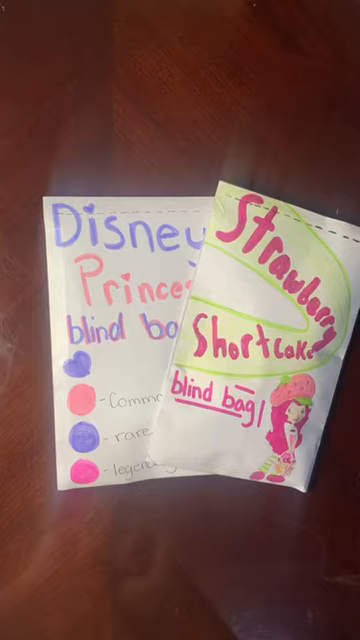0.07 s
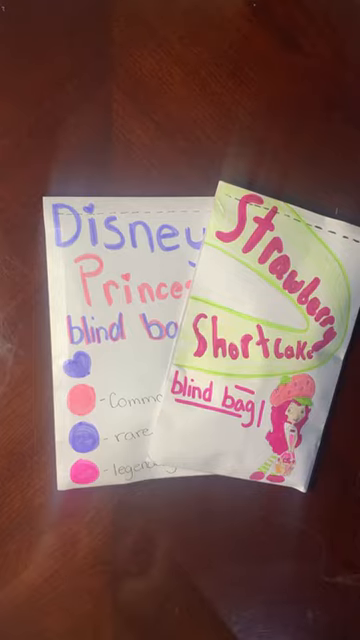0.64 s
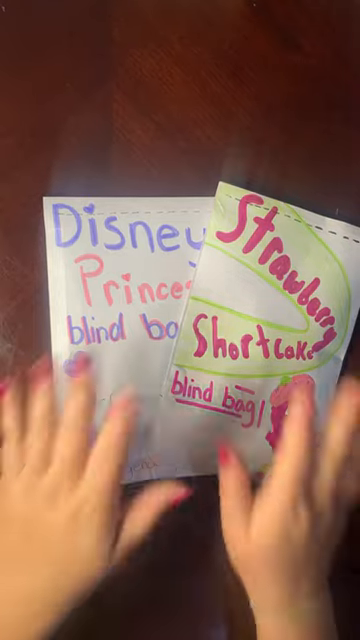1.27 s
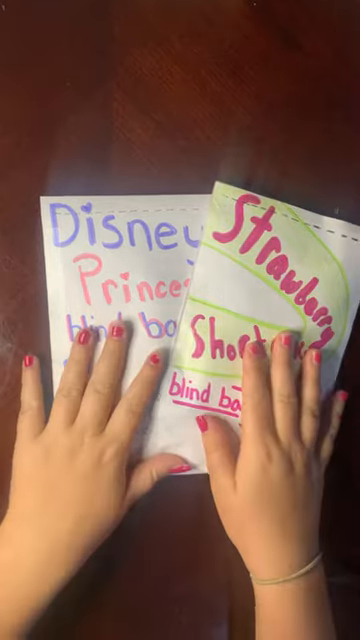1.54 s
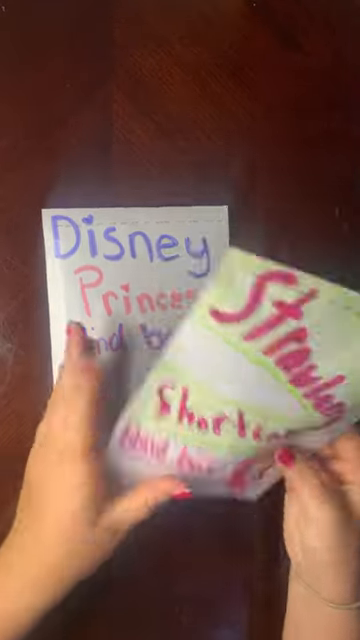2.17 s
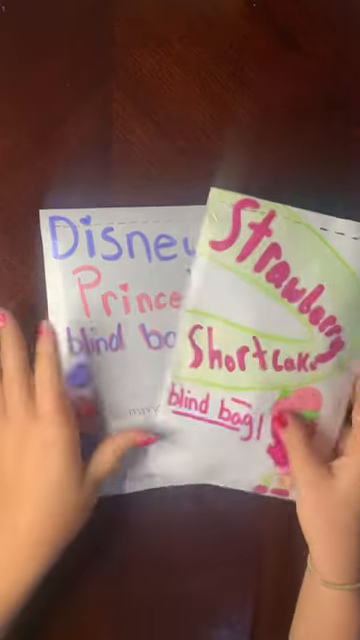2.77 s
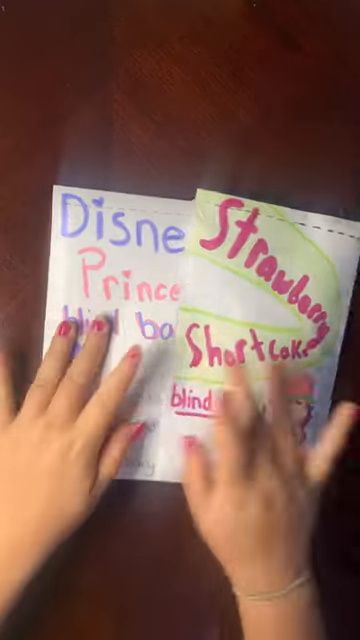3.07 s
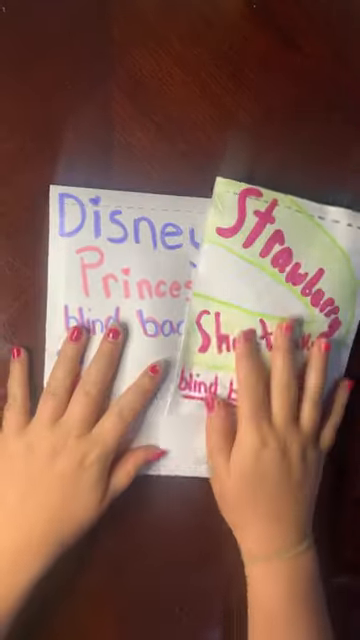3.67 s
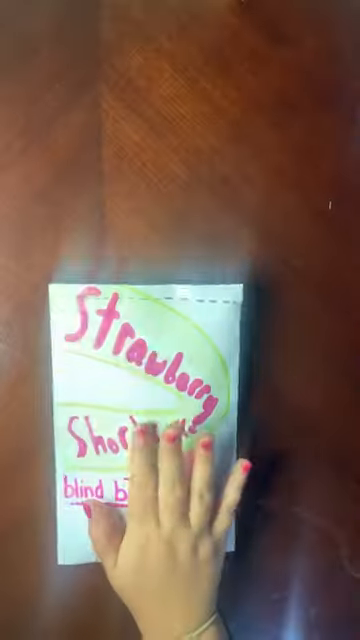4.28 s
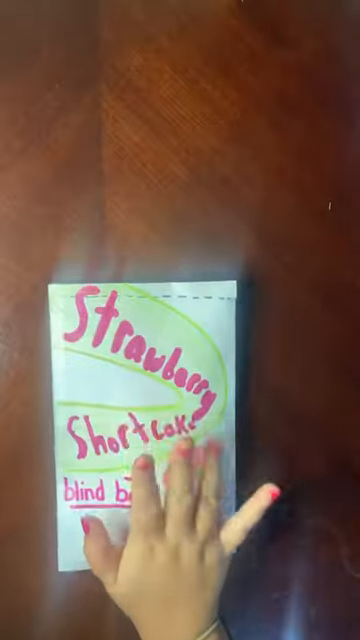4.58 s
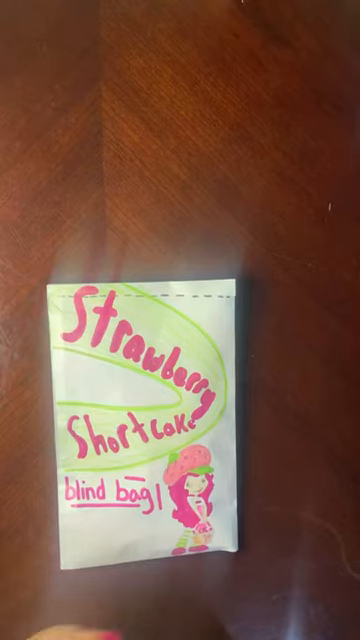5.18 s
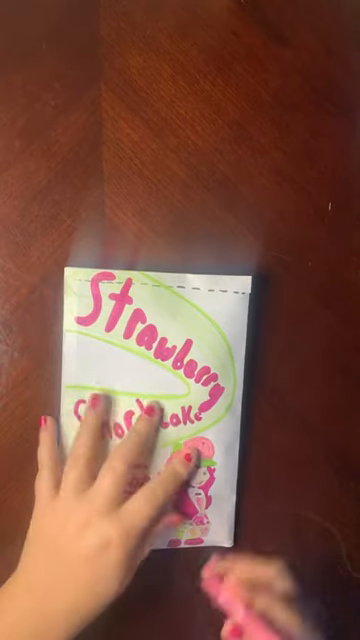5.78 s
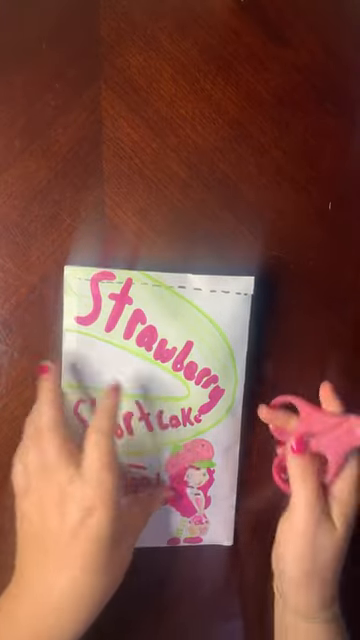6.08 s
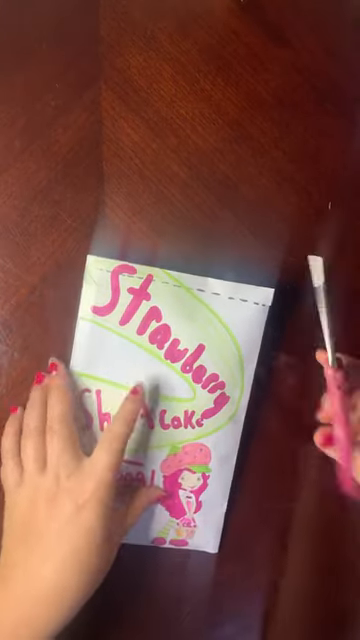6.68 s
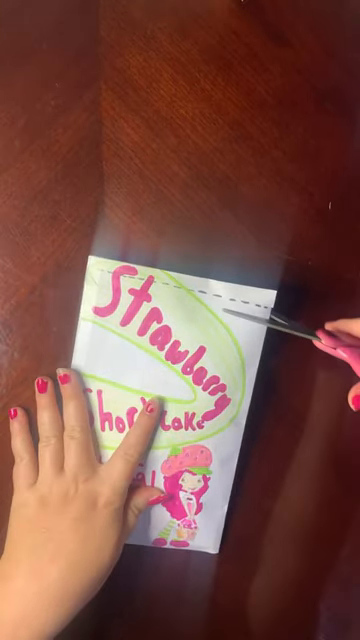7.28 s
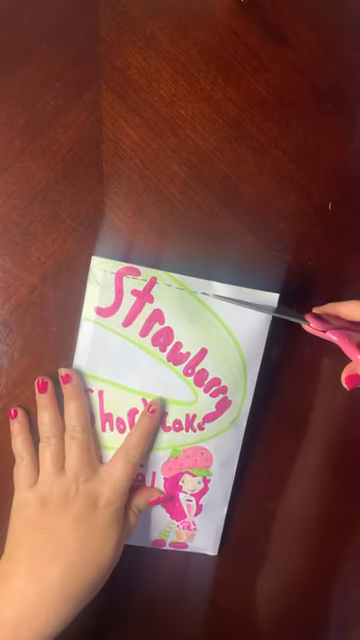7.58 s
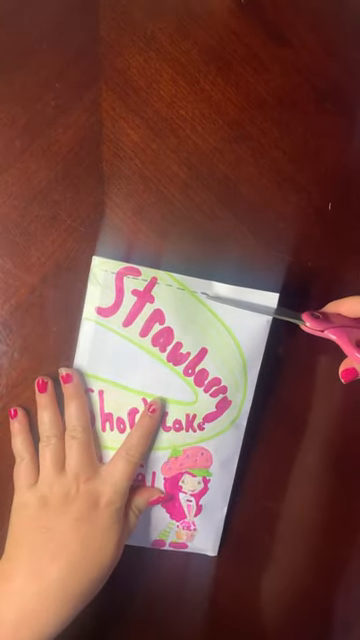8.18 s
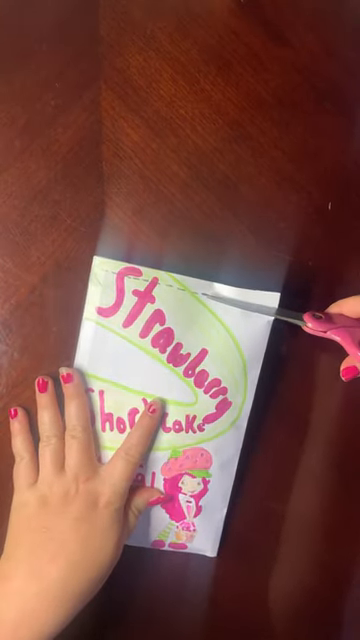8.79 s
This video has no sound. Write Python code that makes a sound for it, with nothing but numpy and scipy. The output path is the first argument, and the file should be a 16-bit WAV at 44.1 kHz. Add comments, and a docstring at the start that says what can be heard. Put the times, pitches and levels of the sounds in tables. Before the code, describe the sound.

In a quiet room with a faint hum, two hands slap down on paper packets and the wooden table booms beneath them. The packets are lifted, patted and slid about, the stiff paper popping and hissing, close to the microphone. The handling softens. Scissors then open with a rub of steel, scrape onto the paper's edge and crunch slowly through it, ending with a clack.

```python
"""Over a quiet room's faint hum, two hands slap down on paper packets on a wooden table, close up.
The table booms; the packets are lifted, patted and slid about, the stiff paper popping as it buckles
and hissing as it drags. Then scissors open with a rub of steel, scrape onto the paper's edge and
close through it, fibre bundle by fibre bundle, with a clack as it gives.
The sound drops out briefly at the very start and once midway."""
import sys
import numpy as np
from scipy import signal
from scipy.fft import rfft, irfft
from scipy.io import wavfile
from scipy.ndimage import uniform_filter1d

SR = 44100
rng = np.random.default_rng(int(sys.argv[2]) if len(sys.argv) > 2 else 0)


def materialize(psi):
    """Save the field psi as 16-bit PCM at rate SR to the path in sys.argv[1].

    A 1-D psi becomes a single channel; in a 2-D psi each row is a channel.
    """
    bounded = np.clip(np.atleast_2d(psi).T, -1, 1)
    quanta = np.round(bounded * 32767).astype(np.int16)
    wavfile.write(sys.argv[1], SR, quanta)


N = 393372
TIME = np.arange(N) / SR

# Cue levels are set ahead of each layer's trim and tone shaping.
# a hand grips or presses a packet: start_s, hold_s, flex_db, table_bump_db
HAND_GRIPS = [(1.53, 0.033, -53.5, -52), (1.72, 0.029, -63.5, -49.5), (1.84, 0.06, -49.5, -52.5),
              (1.96, 0.048, -57.5, -59), (2.03, 0.046, -55, -47.5), (2.1, 0.037, -50.5, -52),
              (2.245, 0.029, -45.5, -53), (2.288, 0.014, -47, -47), (2.37, 0.035, -45, -50.5),
              (2.49, 0.022, -46, -49.5), (2.585, 0.031, -41, -47.5), (2.745, 0.056, -49, -49),
              (2.8, 0.035, -50, -55), (2.895, 0.013, -59, -43.5), (2.94, 0.019, -57, -54),
              (3.07, 0.039, -42.5, -45), (3.165, 0.011, -50.5, -53), (3.225, 0.048, -53, -48.5),
              (3.315, 0.053, -57, -56), (3.39, 0.017, -59, -52), (3.546, 0.023, -45.5, -43.5),
              (3.77, 0.083, -45.5, -46.5), (4.03, 0.082, -61.5, -72), (4.22, 0.033, -61, -68),
              (4.29, .1, -61, -55.5), (4.45, 0.048, -65.5, -71), (4.605, 0.015, -50, -52),
              (5.335, 0.017, -53, -53), (5.42, 0.041, -58, -63), (5.545, 0.032, -49.5, -60),
              (5.62, 0.057, -66, -74), (5.915, 0.0092, -48, -75), (6.17, 0.076, -60.5, -56),
              (6.28, 0.075, -59, -75), (8.04, 0.047, -61.5, -64), (8.67, 0.13, -62, -62),
              (8.86, .05, -58, -66)]
# a packet is pushed over the table or the other packet: start_s, push_s, top_speed_hiss_db
PACKET_PUSHES = [(1.77, 0.089, -44.5), (1.89, 0.038, -52), (1.964, .012, -44.5), (1.975, 0.074, -47),
                 (2.102, 0.026, -42), (2.655, 0.052, -51), (2.728, 0.02, -38), (2.76, 0.064, -43.5),
                 (2.855, 0.027, -32.5), (3.295, .012, -51.5), (3.665, 0.18, -32.5), (5.82, 0.053, -59),
                 (5.905, 0.038, -47)]
# paper buckles and fingertips tap: start_s, body_db, centre_hz, crisp_db
PAPER_POPS = [(1.068, -59, 1500, -55.5), (1.4262, -42, 2430, -45), (1.5605, -33.5, 686, -53),
              (1.5797, -44, 2520, -44), (1.6113, -42, 670, -56), (1.6574, -44, 790, -65),
              (1.6813, -48, 675, -75), (1.8484, -33, 750, -41), (1.8863, -31.5, 2920, -39),
              (2.0372, -42, 1210, -45.5), (2.1039, -34.5, 1970, -40), (2.1172, -34.5, 2720, -37),
              (2.12, -33.5, 1830, -44), (2.152, -25, 1960, -26), (2.156, -46, 2440, -30.5),
              (2.2466, -26, 2440, -34), (2.2744, -52, 1550, -42), (2.324, -48, 1330, -44.5),
              (2.3781, -36, 2500, -47), (2.3958, -35, 1770, -49), (2.4237, -37, 1680, -44),
              (2.4719, -40.5, 1010, -54), (2.4968, -40.5, 970, -59), (2.5186, -40, 1630, -42.5),
              (2.612, -35.5, 1720, -42), (2.6346, -39, 1550, -48), (2.7543, -41, 1780, -39),
              (2.779, -40, 1270, -44), (2.8171, -26, 2540, -41), (2.8994, -35, 2060, -27.5),
              (3.0682, -29.5, 1620, -55), (3.0842, -32.5, 1110, -43), (3.0947, -46, 1460, -41),
              (3.104, -41, 1530, -37.5), (3.1454, -43.5, 2070, -32), (3.2616, -35, 1350, -61),
              (3.3491, -41, 2270, -53), (3.403, -59, 1560, -43.5), (3.4183, -39.5, 1150, -64),
              (3.5583, -34.5, 2630, -34), (3.6063, -23, 1710, -37), (3.623, -26, 2710, -27),
              (3.6308, -33, 2180, -34), (4.041, -48.5, 1190, -69), (4.0976, -45.5, 1470, -72),
              (4.2978, -46, 990, -51.5), (4.3483, -54, 1180, -52), (4.4698, -37.5, 1170, -54),
              (4.6037, -34, 2340, -39.5), (4.6754, -40, 1390, -69), (4.7037, -37.5, 1260, -60),
              (5.3552, -47, 1530, -49), (5.432, -40.5, 2780, -63), (5.4694, -44, 1060, -71),
              (5.5802, -37, 1730, -46), (5.6366, -38, 1600, -68), (5.6601, -41, 1170, -71),
              (5.7304, -46, 1670, -80), (5.9518, -58, 820, -62), (6.734, -52.5, 880, -59),
              (6.7988, -53, 1080, -65), (8.1395, -48, 900, -69), (8.264, -45.5, 960, -67)]
# palms, fingers and packets land: start_s, contact_s, slap_db, crisp_db, thump_db
LANDINGS = [(1.3074, 0.0037, -38.5, -40.5, -54.5), (1.314, 0.014, -15.5, -17, -20.5),
            (1.323, 0.003, -21.5, -26, -33.5), (1.3316, 0.003, -23, -24.5, -37),
            (1.3706, 0.0017, -32.5, -28, -38.5), (2.2427, 0.0054, -42, -48, -50),
            (2.256, 0.0055, -35, -43, -63), (3.0581, 0.011, -36, -43, -48), (3.133, 0.018, -36, -46, -52),
            (3.217, 0.019, -40.5, -68, -50.5), (3.5968, 0.0021, -17.5, -25, -36.5),
            (3.5991, 0.0086, -22, -31.5, -42), (3.611, 0.0039, -18.5, -25.5, -47),
            (4.596, 0.0077, -39, -45, -47.5), (5.408, 0.0022, -41, -44, -63), (5.561, 0.012, -47, -65, -57),
            (6.166, 0.0066, -50.5, -54, -44.5), (6.217, 0.0074, -64, -76, -57),
            (6.2791, 0.0012, -38.5, -38, -69)]
# the blades rub each other as they open: start_s, length_s, level_db
OPENING_RUBS = [(6.623, 0.025, -37.5), (6.662, 0.021, -48.5)]
# the open blades are nudged onto the packet: start_s, length_s, scrape_db, rustle_db
BLADE_NUDGES = [(7.018, .15, -48.5, -55), (7.19, 0.043, -50, -51.5), (7.24, 0.032, -49.5, -47),
                (7.295, 0.05, -57, -55), (7.35, 0.032, -47.5, -49.5), (7.448, 0.013, -61, -52.5)]
# the blade's reflection off the table as the scissors are lowered: time_s, lag_s
REFLECTION_LAG = [(7.02, 0.00088), (7.16, 0.00071), (7.3, 0.00067), (7.4, .00056)]
# the blades are squeezed shut, tearing fine fibres: start_s, length_s, start_db, swell_db_per_s
SQUEEZES = [(7.848, 0.69, -53, -10), (8.635, 0.32, -56, 24)]
# fibre bundles give way: start_s, length_s, level_db
BUNDLE_SNAPS = [(7.932, 0.0027, -45.5), (8.048, 0.012, -42), (8.084, .006, -46), (8.151, 0.0057, -41.5),
                (8.224, 0.0051, -43), (8.25, 0.012, -40), (8.308, .002, -50), (8.324, 0.004, -47),
                (8.345, 0.0061, -41), (8.376, 0.0024, -37), (8.403, 0.0018, -48), (8.438, 0.0034, -40),
                (8.4436, .0008, -33.5), (8.457, 0.0013, -41), (8.473, 0.0085, -42.5),
                (8.487, 0.0018, -37.5), (8.514, 0.0018, -47), (8.6398, 0.0036, -34), (8.647, 0.0018, -37),
                (8.657, 0.0028, -44), (8.676, 0.0022, -38), (8.734, .002, -46), (8.74, 0.0014, -38),
                (8.763, 0.0026, -37.5), (8.768, 0.0066, -33.5), (8.808, 0.009, -26), (8.8638, 0.0046, -32),
                (8.893, 0.0068, -30)]
# the cut travels from near the pivot to the tips: start_s, end_s
PIVOT_TO_TIPS = [7.93, 8.3]
# the sound drops out: start_s, end_s
SILENT_GAPS = [(0, .055), (4.175, 4.211)]

# ringing modes: pitch_hz, level_db, t60_s
TABLE_MODES = [(85, 0, .25), (143, -4, .12), (250, -15, .08), (300, -15, .1), (382, -20, .16)]  # wooden table top
SCISSOR_MODES = [(1150, -7, .007), (1500, -1, .011), (1800, 0, .014), (2380, -1, .011), (2750, -2, .01),
                 (3950, -2, .009)]  # clacking scissors

# EQ curves: frequency_hz, relative_db
ROOM_EQ = [(20, -4), (65, -4), (100, -10.5), (200, -9.5), (400, -16.5), (1000, -20), (2500, -25.5),
           (7000, -28.5), (11000, -28), (16000, -29.5)]  # room tone
BUMP_EQ = [(20, -5.5), (50, 0), (100, -4.5), (170, -6.5), (260, -12.5), (600, -38.5)]  # hands bumping the table
FLEX_EQ = [(80, -14), (250, 2), (600, 1.5), (1100, -0.5), (1900, -4.5), (3200, -6.5), (5000, -11),
           (8000, -18), (16000, -39)]  # bending paper
SLIDE_EQ = [(300, -1), (1500, -2.5), (4000, -3), (6500, -2), (10000, 2), (13000, 5.5), (16000, 2)]  # dragged paper
CRISP_EQ = [(500, -26.5), (2500, -12), (5000, 3), (7500, 1.5), (10000, 1.5), (13500, -0.5), (16000, -1.5)]  # bright edge of pops and slaps
SLAP_EQ = [(60, -9.5), (200, -4), (480, -1), (800, -0.5), (1200, -5), (1700, -1), (2300, -7.5),
           (3200, -4.5), (5000, -10), (7000, -21.5), (16000, -28)]  # body of a slap
STEEL_EQ = [(900, -28), (2050, -8), (2600, -17), (3150, -9), (3700, -18), (5100, -7), (5850, 2),
            (6400, -17), (7300, -1), (8700, -7), (11200, 2), (12400, 1), (13600, -8), (15400, -2)]  # blade on blade
SCRAPE_EQ = [(1000, -17), (2500, -11), (3650, -1), (4350, -7), (4800, 3), (5500, 3), (6400, -12),
             (7700, -1), (8900, -6), (10600, -1), (12500, -3), (16000, -10)]  # blade on paper
FIBRE_EQ = [(200, -10.5), (900, -4), (1800, -21), (4200, -18.5), (5300, -7.5), (6100, -9), (6900, -18),
            (9000, -8.5), (10200, -7), (11200, -2), (12400, -10), (13400, 6.5), (14800, 4.5), (16000, -4)]  # parting fibres

TRANSIENT_S = .004  # a pop, flick or clack has its rms level set over this span


def undb(db):
    """Decibels to gain."""
    return 10 ** (np.asarray(db) / 20)


def unit(x):
    """Scale to rms 1."""
    return x / np.sqrt(np.mean(x ** 2))


def add(track, start_s, sound):
    """Mix a sound into a track at its cue."""
    i = int(start_s * SR)
    track[i:i + len(sound)] += sound[:N - i]


def colour(x, eq, size=4096):
    """Minimum-phase EQ that keeps the power of white noise."""
    hz, db = np.transpose(eq)
    shape = np.interp(np.log(np.arange(size // 2 + 1) * SR / size + 1), np.log(hz), db)
    cepstrum = irfft(np.log(undb(shape)))
    cepstrum[1:size // 2] *= 2
    cepstrum[size // 2 + 1:] = 0
    response = irfft(np.exp(rfft(cepstrum)))
    return signal.fftconvolve(x, response / np.linalg.norm(response))[:len(x)]


def resonate(x, hz, q):
    """Two-pole band-pass."""
    return signal.lfilter(*signal.iirpeak(hz, max(q, 2.5 * hz / SR), fs=SR), x)


def with_level(x, db, span_s=TRANSIENT_S):
    """Scale a hit so that its first span_s seconds have the given rms level."""
    return x * undb(db) / np.sqrt(np.mean(x[:int(span_s * SR) + 1] ** 2))


def wander(rate_hz):
    """Smooth random drift with a spread near 1."""
    step = int(SR / rate_hz)
    return 1.2 * uniform_filter1d(np.repeat(rng.standard_normal(N // step + 1), step), step)[:N]


def grains(per_s, spread_db, cap_db=20):
    """Randomly timed micro-clicks, most tiny and a few large; rms 1."""
    size = undb(np.minimum(spread_db * rng.exponential(size=N), cap_db))
    return unit((rng.random(N) < per_s / SR) * size * rng.choice([-1, 1], N))


def stroke(length_s, attack_s, release_s):
    """Envelope of one hand movement: attack, hold, release."""
    t = np.arange(int((length_s + 8 * release_s) * SR)) / SR
    return (1 - np.exp(-t / attack_s)) * np.exp(-np.maximum(t - length_s, 0) / release_s)


def strokes(cues, attack_s, release_s):
    """Play cues as strokes: one gain curve for each level column."""
    curves = np.zeros((len(cues[0]) - 2, N))
    for start, length, *levels in cues:
        for curve, db in zip(curves, levels):
            add(curve, start, undb(db) * stroke(length, attack_s, release_s))
    return curves


def room_tone(air_db=-62, hum_hz=120, hum_db=-70.3):
    """The bed: soft room noise and a faint mains hum, each wavering by about a decibel."""
    air = unit(colour(rng.standard_normal(N), ROOM_EQ)) * undb(air_db + wander(3.6))
    hum = np.sqrt(2) * undb(hum_db + wander(0.98)) * np.sin(2 * np.pi * hum_hz * TIME)
    return air + hum


def room_reverb(x, early_db=-12, late_db=-17, treble_db=-21, crossover_hz=4000):
    """Quick reflections from table and body, then the short, duller tail of a furnished room."""
    t = np.arange(SR // 2) / SR

    def tail(delay_s, t60_s):
        decay = rng.standard_normal(len(t)) * (t > delay_s) * np.exp(-np.log(1000) * t / t60_s)
        return decay / np.linalg.norm(decay)

    early = undb(early_db) * tail(delay_s=.004, t60_s=.13)
    late = undb(late_db) * tail(delay_s=.009, t60_s=.44)
    treble = undb(treble_db) * tail(delay_s=.009, t60_s=.38)
    dull = signal.lfilter(*signal.butter(2, crossover_hz, "low", fs=SR), early + late)
    bright = signal.lfilter(*signal.butter(2, crossover_hz, "high", fs=SR), treble)
    return x + signal.fftconvolve(x, dull + bright)[:N]


def table_bumps(bump, trim_db=-1):
    """Gripping hands bump a low rumble out of the table."""
    return undb(trim_db) * colour(bump * rng.standard_normal(N), BUMP_EQ)


def paper_crackle(flex, catch_db=4.5, trim_db=-1.5):
    """Flexing sheets catch unevenly and crackle coarsely."""
    catching = undb(catch_db * wander(140))
    crackle = grains(per_s=1600, spread_db=4.5, cap_db=14)
    return undb(trim_db) * colour(flex * catching * crackle, FLEX_EQ)


def slide_envelope(push_power=0.73, coast_share=0.32):
    """A pushed packet gathers speed, then coasts to rest; the gain follows the speed."""
    t = np.arange(SR) / SR
    envelope = np.zeros(N)
    for start, push_s, db in PACKET_PUSHES:
        progress = t / push_s
        speeding = np.minimum(progress, 1) ** push_power
        coasting = np.exp(-np.maximum(progress - 1, 0) / coast_share)
        add(envelope, start, undb(db) * speeding * coasting)
    return envelope


def paper_hiss(flex, rub_db=-7, glide_threshold_db=-51.5, trim_db=-1):
    """Sliding packets, and bent sheets rubbing their neighbours, catch on countless fibres."""
    slide = np.hypot(slide_envelope(), undb(rub_db) * flex)
    # a fast slide glides evenly; a slow one sticks and breaks into separate ticks
    gliding = slide / (slide + undb(glide_threshold_db))
    smooth = gliding * grains(per_s=33000, spread_db=3.5)
    ticks = (1 - gliding) * grains(per_s=2000, spread_db=1.5, cap_db=13)
    friction = (smooth + ticks) / np.hypot(gliding, 1 - gliding)
    return undb(trim_db) * colour(slide * friction, SLIDE_EQ)


def crinkle_cues(flex, count=240, spread_db=2, centre_hz=1400, spread_octaves=0.32, crisp_db=-6):
    """Cues for small random pops, louder the harder the paper is bent; columns as in PAPER_POPS."""
    when = rng.integers(0, N, count)
    size, pitch, snap = rng.standard_normal((count, 3)).T
    body_db = 20 * np.log10(flex[when] + 1e-9) + spread_db * size
    hz = centre_hz * 2 ** (spread_octaves * pitch)
    return np.transpose([when / SR, body_db, hz, body_db + crisp_db + spread_db * snap]).tolist()


def paper_pops(cues, flutter_s=0.00156, snap_s=0.0007, shiver_s=0.0051,
               body_trim_db=-2, crisp_trim_db=-1):
    """A patch of paper flips: one push into a damped resonance, a sharp snap, then a shiver."""
    t = np.arange(SR // 20) / SR
    body, crisp = np.zeros((2, N))
    for start, body_db, hz, crisp_db in cues:
        flutter, fizz = rng.standard_normal((2, len(t)))
        push = (t == 0) + 0.21 * flutter * np.exp(-t / flutter_s)
        # a big patch moves slowly, so it has no treble of its own
        soften = signal.butter(2, min(1.7 * hz, SR / 3), fs=SR)
        patch = signal.lfilter(*soften, resonate(push, hz, q=0.63))
        add(body, start, with_level(patch, body_db + body_trim_db))
        snap = fizz * (np.exp(-t / snap_s) + 0.1 * np.exp(-t / shiver_s))
        add(crisp, start, with_level(snap, crisp_db + crisp_trim_db))
    return body + colour(crisp, CRISP_EQ)


def corner_flick(start_s=2.152, pitch_hz=14100, level_db=-22.5, ring_s=0.00017):
    """The stiff corner of the lifted packet flicks free with one thin, hard crack."""
    t = np.arange(SR // 50) / SR
    out = np.zeros(N)
    ping = np.sin(2 * np.pi * pitch_hz * t) * np.exp(-t / ring_s)
    add(out, start_s, with_level(resonate(ping, pitch_hz, q=3), level_db))
    return out


def ring(modes, t):
    """Decaying sines of a struck object."""
    return sum(undb(db) * np.sin(2 * np.pi * hz * t) * np.exp(-np.log(1000) * t / t60)
               for hz, db, t60 in modes)


def hand_slaps(release_s=0.0031, crisp_release_s=0.0034,
               slap_trim_db=-.5, crisp_trim_db=-1, thump_trim_db=-1):
    """Paper is flattened in a few ms of dense contacts, and the table top booms under it."""
    t = np.arange(SR // 3) / SR
    slap, crisp, thump = np.zeros((3, N))
    boom = ring(TABLE_MODES, t)
    for start, contact_s, slap_db, crisp_db, thump_db in LANDINGS:
        after = np.maximum(t - contact_s, 0)
        smack = rng.standard_normal(len(t)) * np.exp(-after / release_s)
        crack = rng.standard_normal(len(t)) * np.exp(-.6 * t / contact_s - after / crisp_release_s)
        add(slap, start, with_level(smack, slap_db + slap_trim_db, contact_s))
        add(crisp, start, with_level(crack, crisp_db + crisp_trim_db, contact_s))
        add(thump, start, with_level(boom, thump_db + thump_trim_db, span_s=0.011))
    return colour(slap, SLAP_EQ) + colour(crisp, CRISP_EQ) + thump


def scissors_open():
    """Steel rubs on steel as the blades part."""
    rub, = strokes(OPENING_RUBS, attack_s=0.0048, release_s=0.0067)
    return colour(rub * grains(per_s=12000, spread_db=2.5), STEEL_EQ)


def blade_scrape(chatter_db=2, reflection_gain=.5, ring_hz=4880, ring_q=5.6, ring_db=-2,
                 damping_db_per_s=33, scrape_trim_db=-1, rustle_trim_db=-2):
    """The blade scrapes the packet's rim and rings until the paper damps it; the packet rustles."""
    scrape, rustle = strokes(BLADE_NUDGES, attack_s=0.0048, release_s=0.015)
    friction = grains(per_s=12000, spread_db=1.5) * undb(chatter_db * wander(150))
    edge = colour(scrape * friction, SCRAPE_EQ)
    # the shortening reflection off the table combs the treble into rising bands
    treble = signal.filtfilt(*signal.butter(2, 6000, "high", fs=SR), edge)
    lag_s = np.interp(TIME, *np.transpose(REFLECTION_LAG))
    reflection = reflection_gain * np.interp(TIME - lag_s, TIME, treble)
    singing = unit(resonate(resonate(rng.standard_normal(N), ring_hz, ring_q), ring_hz, ring_q))
    in_paper_s = np.maximum(TIME - BLADE_NUDGES[0][0], 0)
    ringing = scrape * undb(ring_db - damping_db_per_s * in_paper_s) * singing
    crackle = colour(rustle * grains(per_s=3000, spread_db=2), FLEX_EQ)
    packet = resonate(crackle, hz=1400, q=0.39)
    return undb(scrape_trim_db) * (edge + reflection + ringing) + undb(rustle_trim_db) * packet


def squeeze_envelope():
    """Pressure of the closing blades: each squeeze builds, then eases or swells steadily."""
    pressure = np.zeros(N)
    for start, length, db, swell in SQUEEZES:
        shape = stroke(length, attack_s=0.037, release_s=.015)
        add(pressure, start, shape * undb(db + swell * np.arange(len(shape)) / SR))
    return pressure


def fibre_tears(jerk_db=7, tear_trim_db=-1, strand_db=4, attack_s=.0005, release_s=0.00083):
    """Fine fibres shear in jerks under the blades, and whole bundles part with a snap."""
    t = np.arange(SR // 10) / SR
    jerks = undb(jerk_db * np.clip(wander(260), -2, 1.7))
    tearing = unit(jerks * grains(per_s=5700, spread_db=3.5, cap_db=19))
    fibres = undb(tear_trim_db) * squeeze_envelope() * tearing
    for start, length, db in BUNDLE_SNAPS:
        # single fibres stand out of each bundle as it parts
        strands = np.repeat(undb(strand_db * rng.standard_normal(len(t))), SR // 1500)[:len(t)]
        parting = (1 - np.exp(-t / attack_s)) * np.exp(-np.maximum(t - length, 0) / release_s)
        add(fibres, start, with_level(strands * rng.laplace(size=len(t)) * parting, db, length))
    return fibres


def scissors_cut(drag_db=-3.5, drag_fade_db=-14, pivot_pitch_ratio=0.92, pivot_db=-3):
    """Near the pivot the blade drags dully; toward the tips the fibres snap higher and cleaner."""
    fibres = fibre_tears()
    travel = np.interp(TIME, PIVOT_TO_TIPS, [0, 1])
    drag = undb(drag_db + drag_fade_db * travel) * fibres * rng.choice([-1, 1], N)
    at_pivot = colour(fibres * (1 - travel), np.array(FIBRE_EQ) * [pivot_pitch_ratio, 1])
    at_tips = colour(fibres * travel, FIBRE_EQ)
    return at_tips + undb(pivot_db) * at_pivot + colour(drag, SCRAPE_EQ)


def scissors_clack(start_s=8.815, level_db=-26, low_cut_hz=800):
    """The paper gives and the scissors clack; such a small tool radiates little bass."""
    t = np.arange(SR // 10) / SR
    out = np.zeros(N)
    clack = signal.lfilter(*signal.butter(2, low_cut_hz, "high", fs=SR), ring(SCISSOR_MODES, t))
    add(out, start_s, with_level(clack, level_db))
    return out


def scene():
    """Paper and scissors share one room reverb over the room tone, in mono."""
    flex, bump = strokes(HAND_GRIPS, attack_s=0.0018, release_s=0.033)
    hits = hand_slaps() + paper_pops(PAPER_POPS + crinkle_cues(flex)) + corner_flick()
    handling = paper_crackle(flex) + paper_hiss(flex) + table_bumps(bump)
    scissors = scissors_open() + blade_scrape() + scissors_cut() + scissors_clack()
    return (room_reverb(hits + handling + scissors) + room_tone())[None]


def record(dry, gap_db=-55.5, top_hz=16000):
    """The sound drops out briefly twice, and a steep low-pass takes off the very top."""
    gate = np.ones(N)
    for start, end in SILENT_GAPS:
        gate[int(start * SR):int(end * SR)] = undb(gap_db)
    low_pass = signal.ellip(10, .2, 80, top_hz, fs=SR, output="sos")
    return signal.sosfilt(low_pass, dry * uniform_filter1d(gate, size=200))


dry = scene()
out = record(dry)
materialize(out)
```